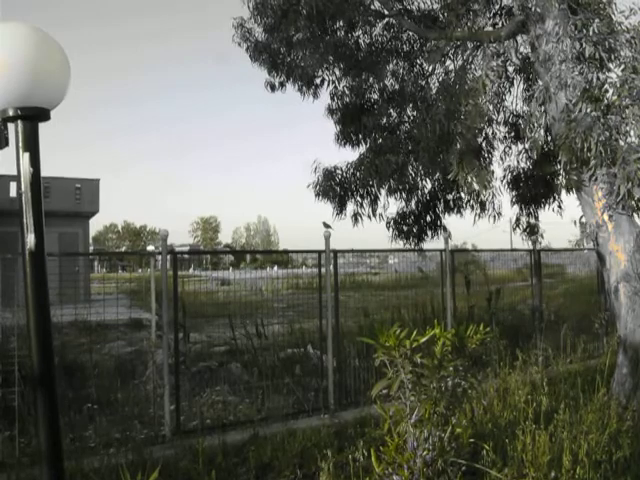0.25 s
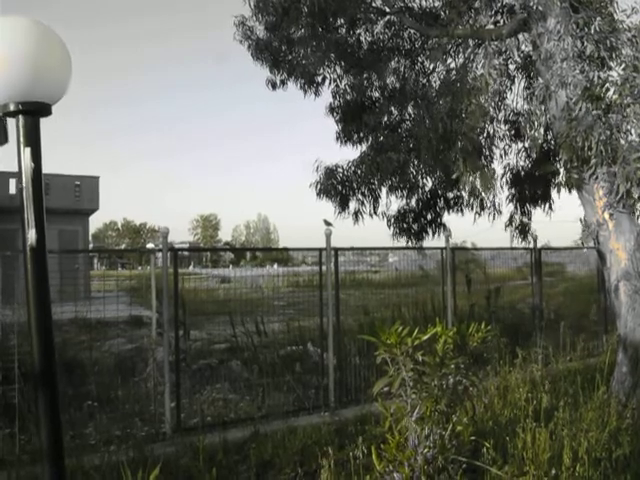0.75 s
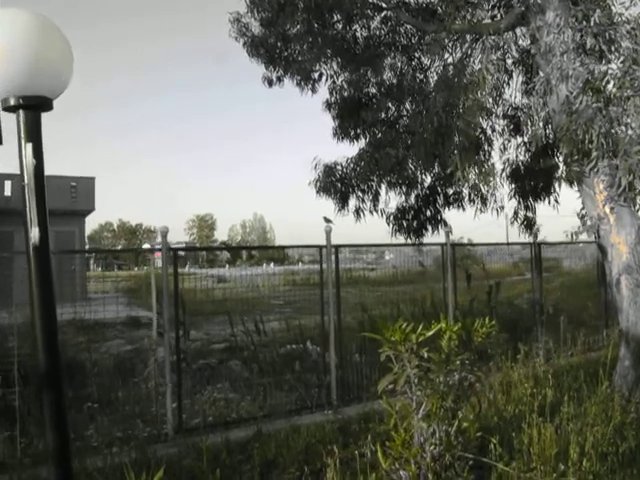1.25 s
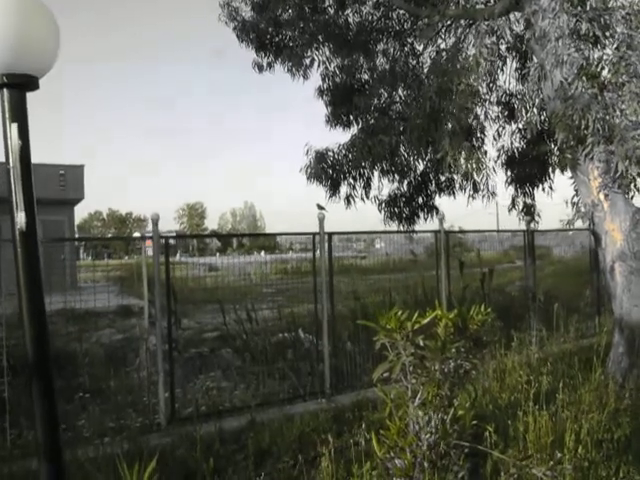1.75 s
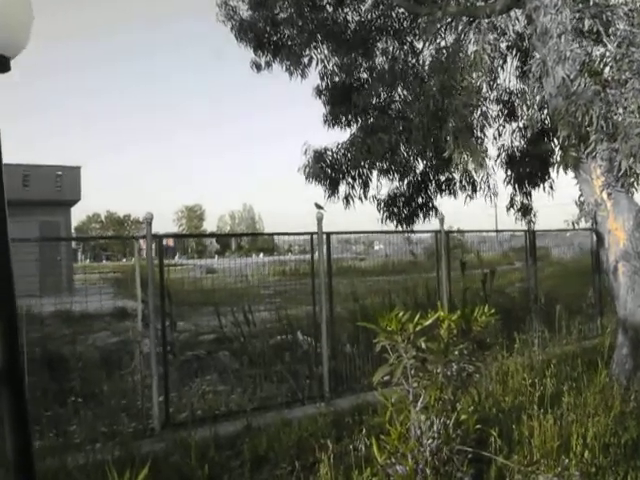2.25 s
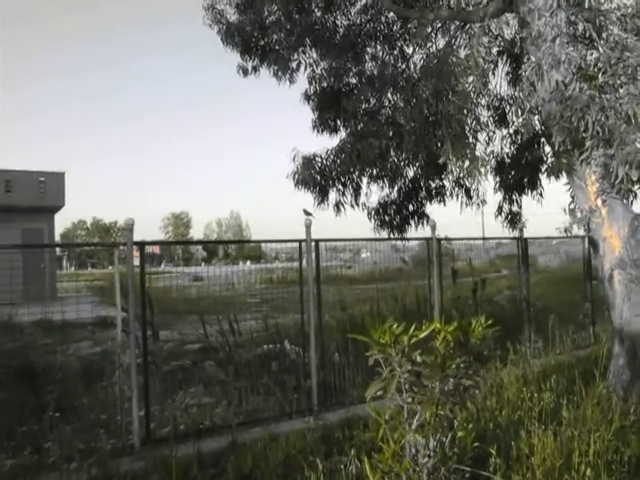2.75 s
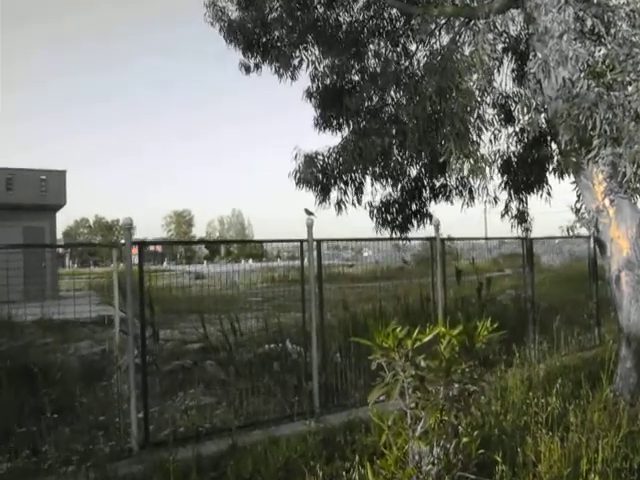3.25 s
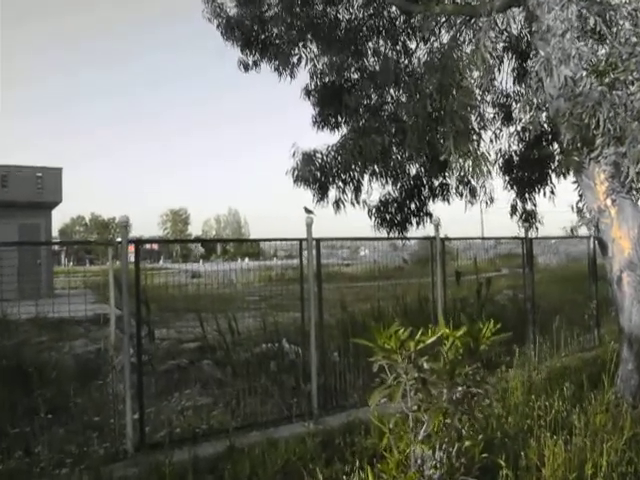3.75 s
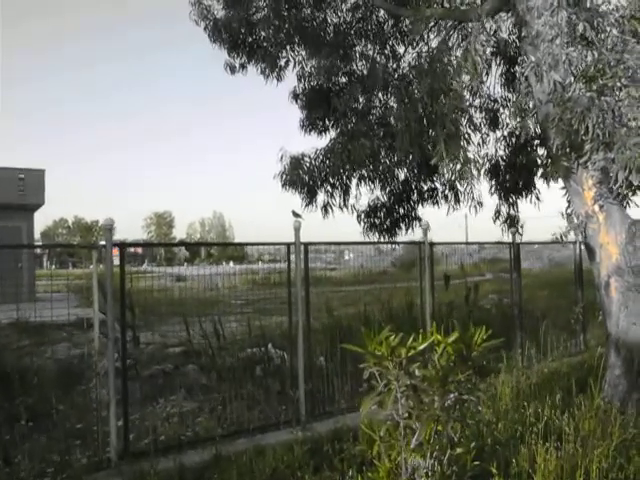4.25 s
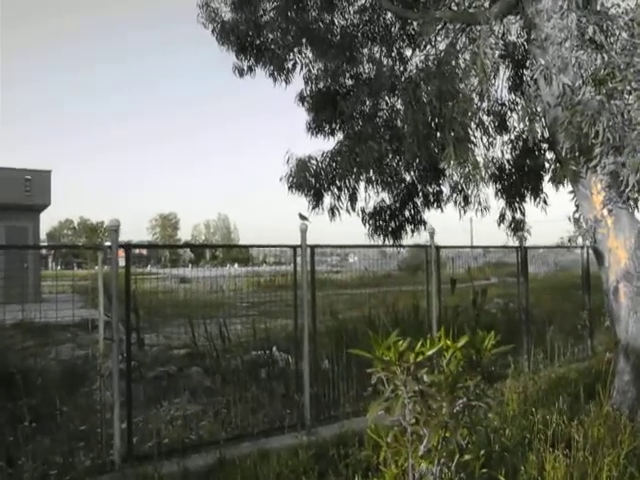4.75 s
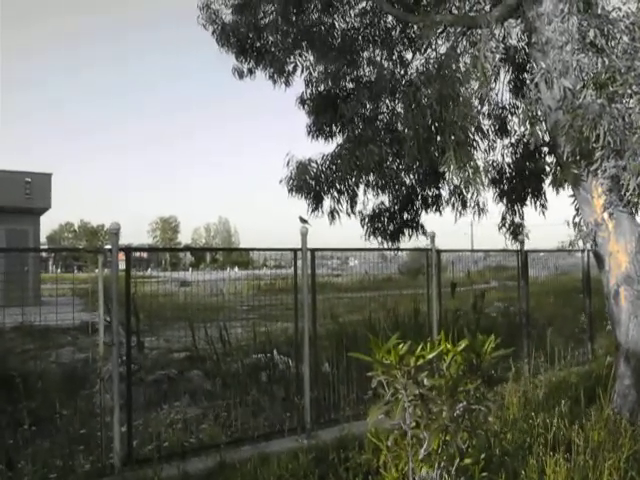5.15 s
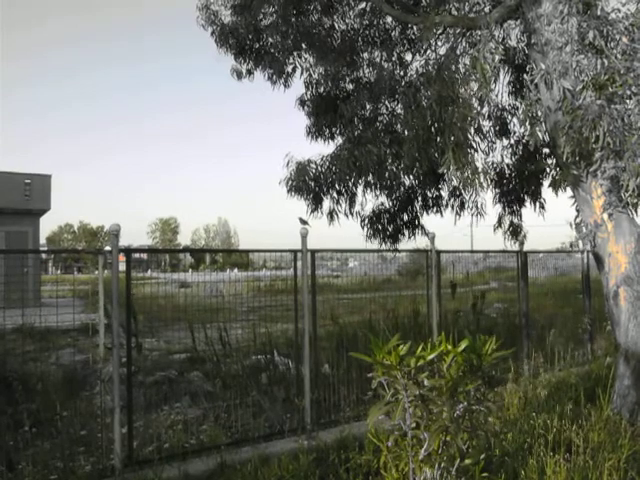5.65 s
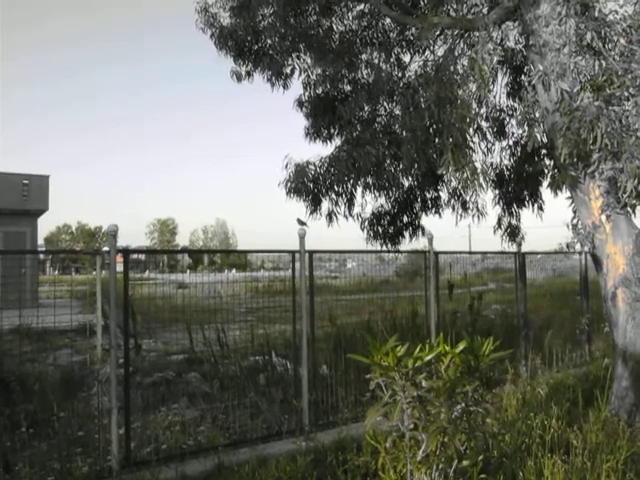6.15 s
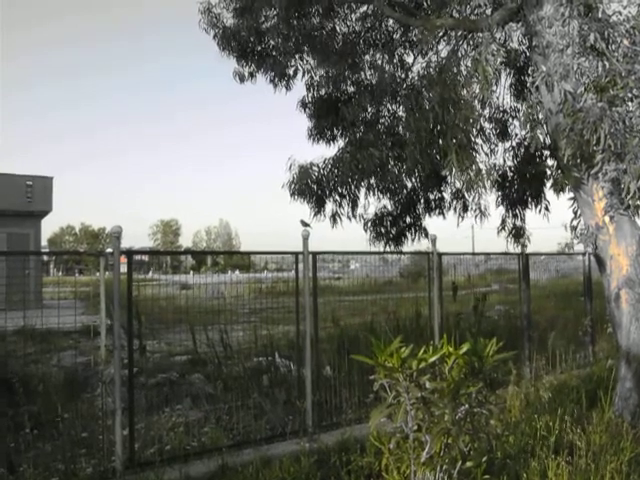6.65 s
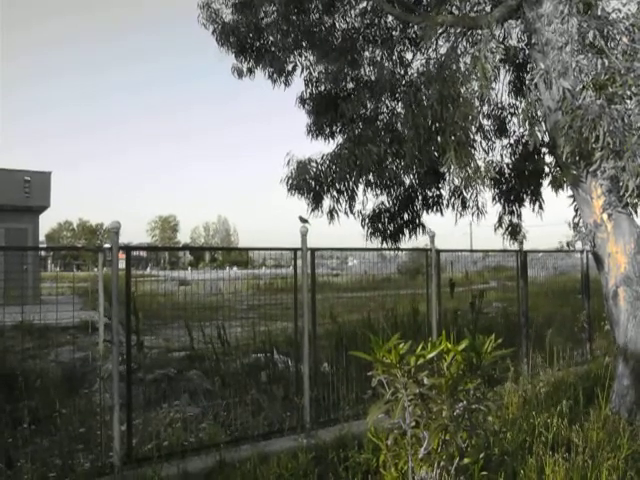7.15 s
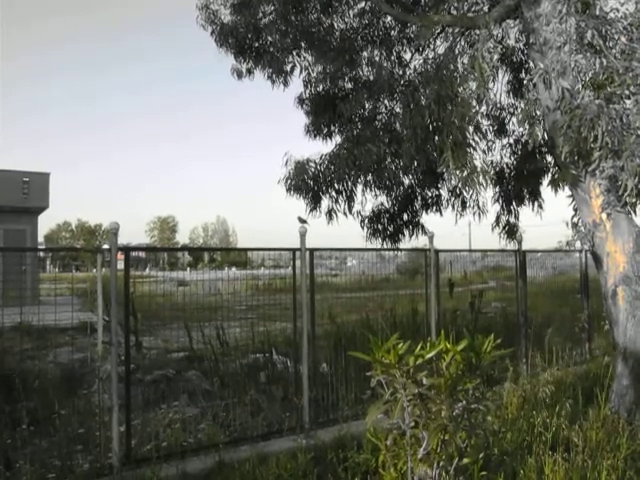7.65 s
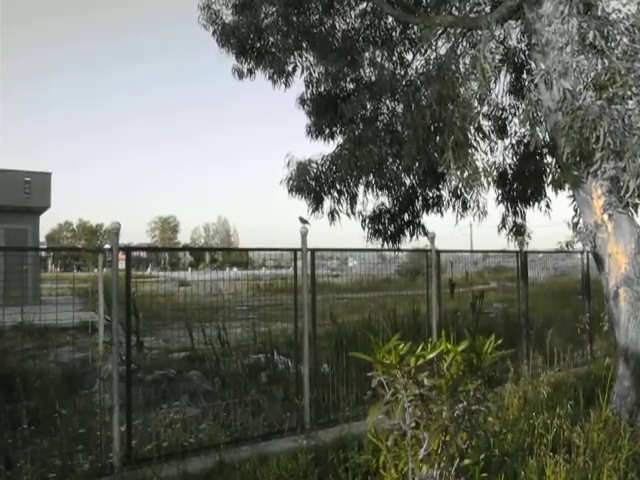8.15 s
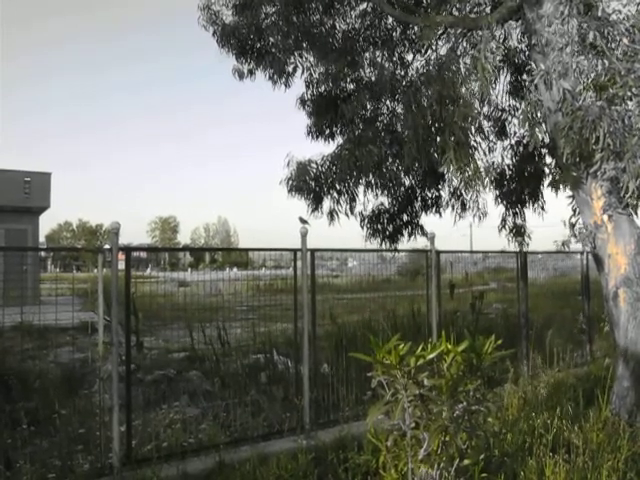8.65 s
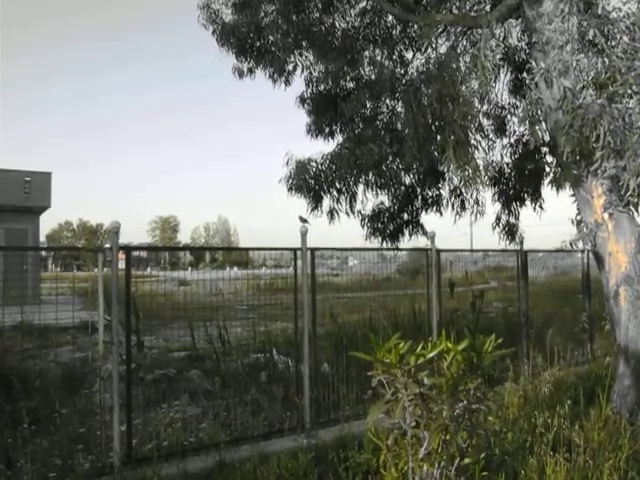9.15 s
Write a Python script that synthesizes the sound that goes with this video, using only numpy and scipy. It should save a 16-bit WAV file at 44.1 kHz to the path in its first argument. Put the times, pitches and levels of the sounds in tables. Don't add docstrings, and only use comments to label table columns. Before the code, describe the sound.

A nightingale sings close to a handheld camera in a garden by a wire fence. It starts with a soft rising whistle, quickens into bright slurs, whipping warbles and a low bubbling run, then rests while distant birds chirp. Two more phrases follow, with long rising whistles and repeated falling slurs. Soft leaf hiss, a faint frog chorus, light early wind and small camera clicks lie around it, with a short echo.

```python
import sys
import numpy as np
from scipy import signal
from scipy.fft import irfft
from scipy.io import wavfile
from scipy.ndimage import uniform_filter1d

SR = 44100
rng = np.random.default_rng(int(sys.argv[2]) if len(sys.argv) > 2 else 0)


def convert_level_to_amplitude(level_db):
    exponent = np.asarray(level_db, float) / 20
    return 10 ** exponent


def log_audio(samples):
    frames = np.atleast_2d(samples).T
    limited = np.clip(frames, -1, 1)
    pcm = np.round(limited * 32767).astype(np.int16)
    wavfile.write(sys.argv[1], SR, pcm)


N = 414099


def evened(x):
    return x / np.sqrt(np.mean(x ** 2) + 1e-20)


def add(mix, s, sound):
    part = mix[round(s * SR):][:len(sound)]
    part += sound[:len(part)]


def wander(rate, count=30):
    t = np.arange(0, N + 256, 256) / SR
    slow = sum(np.sin(2 * np.pi * (f * t + rng.random())) for f in np.geomspace(rate / 30, rate, count))
    return np.interp(np.arange(N) / SR, t, evened(slow))


def coloured(points, patchy_db):
    hz = np.fft.rfftfreq(1024, 1 / SR)
    a, b, patches = rng.standard_normal((N // 256 + 5, 513, 3)).T
    patches = evened(uniform_filter1d(uniform_filter1d(patches, 10, 0), 12, 1))
    f, db = np.transpose(points)
    shape_db = np.interp(np.log(hz + 1), np.log(f + 1), db)[:, None]
    frames = (a + 1j * b) * convert_level_to_amplitude(shape_db + patchy_db * patches)
    return evened(signal.istft(frames, nperseg=1024, noverlap=768)[1][:N])


# frequency in Hz, lift in dB.
BEAK = [(3000, 6.5), (4800, -9.5), (7500, -5), (10500, 8), (14000, 16)]


def note(rows, voice, rise=0.0026, fall=0.0028, glide=0.0022, push=0.12):
    s, hz, db = np.transpose(rows)
    loudest, harmonics_db, flutter = voice
    t = np.arange(s[0], s[-1], 1 / SR)
    bend = max(glide, np.diff(s).min() - .004)
    hz = uniform_filter1d(np.interp(t, s, hz), max(round(bend * SR), 1), mode="nearest") / loudest
    tremor = evened(uniform_filter1d(rng.standard_normal(SR // 3)[:len(t) + 400], 60))
    hz = hz * (1 + flutter * tremor[:len(t)])
    turns = np.cumsum(hz) / SR
    level = np.interp(t, s, convert_level_to_amplitude(db))
    effort_db = push * (20 * np.log10(level) + 30.5)
    tone = 0
    for k, g in enumerate(harmonics_db, 1):
        lift_db = (k > loudest) * (np.interp(k * hz, *np.transpose(BEAK)) + effort_db)
        audible = k * hz < .4 * SR
        tone = tone + convert_level_to_amplitude(g + lift_db) * np.sin(2 * np.pi * k * turns + k * k) * audible
    quick = min(1, (s[-1] - s[0]) / 0.031)
    attack = np.clip((t - s[0]) / (rise * quick), 0, 1)
    release = np.clip((s[-1] - t) / (fall * quick), 0, 1)
    return s[0], np.sqrt(2) * level * np.sin(np.pi / 2 * attack * release) * tone


def sing(notes, voice):
    out = np.zeros(N)
    for rows in notes:
        add(out, *note(rows, voice))
    return out


def repeats(shape, events):
    return [np.array(shape) * [1, np.prod(factor), 1] + [s, 0, db] for s, db, *factor in events]


def trill(start, spacing, full_db, first_db, left, count):
    return [(start + k * spacing, full_db + first_db * left ** k) for k in range(count)]


def strokes(rows, shape, count=9):
    in_db, top, out_db, ease = shape
    u = np.linspace(0, 1, count)
    path = u + ease * (u * u * (3 - 2 * u) - u)
    level_db = 20 * np.log10(np.interp(u, [0, top, 1], convert_level_to_amplitude(np.array([in_db, 0, out_db]))))
    return [np.transpose([s + n * u, a + (b - a) * path, db + level_db]) for s, n, a, b, db in rows]


def arches(rows, ends_db=-6):
    return [np.array([(s, a, db + ends_db), (s + n / 2, b, db), (s + n, a, db + ends_db)])
            for s, n, a, b, db in rows]


def rises(rows, count=30):
    out = []
    for s, n, low, top, db in rows:
        t = np.linspace(0, n, count)
        level_db = db + np.interp(t, [0, .024, .1], [-15, 0, -3.5])
        hz = top - (top - low) * np.exp(-t / .13)
        out.append(np.transpose([s + t, hz, level_db]))
    return out


# frequency in Hz, density in dB per Hz.
HISS = [(120, -12.5), (200, -0.5), (780, -4.5), (1940, -9), (3600, -8.5), (5130, -11), (6500, -12.5),
        (9750, -8.5), (16000, -11)]
GUST = [(12, -28.5), (20, -2.5), (65, 4), (180, -8), (340, -23), (700, -66)]
# time in seconds, level in dB.
WIND = [(0.0, -49), (0.21, -62), (0.47, -52.5), (0.78, -59.5), (1.1, -49.5), (1.18, -56.5), (2.38, -61),
        (6.33, -61), (9.39, -59)]


def air():
    t = np.arange(N) / SR
    wind_db = np.interp(t, *np.transpose(WIND)) + 2.23 * wander(15.0)
    wind = coloured(GUST, 1.37) * convert_level_to_amplitude(wind_db)
    whine = np.sqrt(2) * convert_level_to_amplitude(-66.5 + .6 * wander(9.0)) * np.sin(2 * np.pi * 5880.5 * t)
    swell = convert_level_to_amplitude(-54 + .6 * wander(3.0))
    return swell * coloured(HISS, 1.76) + wind + whine


# centre in Hz, width in Hz, level in dB.
FROGS = [(982, 32, -9), (1070, 22, -4.5), (1139, 91, -12), (1192, 43, -2.5), (1613, 40, -11),
         (543, 53, -13.5)]
# time in seconds, level in dB.
CHORUS = [(0.0, -64.5), (4.81, -58.5), (9.39, -63.5)]


def frogs():
    out, t = np.zeros(N), np.arange(N) / SR
    for hz, width, db in FROGS:
        r = np.exp(-np.pi * width / SR)
        noise = rng.standard_normal(N) + 1j * rng.standard_normal(N)
        crowd = signal.lfilter([1 - r], [1, -r], noise)
        throb = convert_level_to_amplitude(3.2 * wander(12.0))
        out += evened((crowd * np.exp(2j * np.pi * hz * t)).real) * convert_level_to_amplitude(db) * throb
    return out * convert_level_to_amplitude(np.interp(t, *np.transpose(CHORUS)))


PURE = 1, [0, -28, -34, -47, -49, -41], 0.0048
SHRILL = 1, [0, -19], 0.004
# start and length in seconds, from and to in Hz, level in dB.
FAR_CHIRPS = [(2.204, .012, 3600, 6370, -58), (3.46, .13, 3920, 3960, -61), (3.59, .03, 3960, 3360, -52),
              (3.858, .02, 3120, 4150, -51), (4.362, .008, 4060, 5380, -55), (4.59, .06, 4780, 5050, -57),
              (4.633, .012, 4670, 7890, -57), (4.805, .017, 4850, 4250, -54), (4.94, .022, 3200, 3700, -55),
              (5.025, .023, 4960, 4200, -54), (5.078, .014, 3980, 5090, -54),
              (5.155, .017, 2960, 3600, -55), (5.225, .01, 2290, 1860, -54), (5.238, .012, 3150, 5060, -57),
              (5.41, .026, 4150, 4600, -53), (5.497, .01, 2180, 3020, -53), (8.8, .025, 3780, 3380, -57),
              (9.282, .023, 4100, 4540, -55)]
CHIRP = -2, .4, -3, .3
# start and length in seconds, ends and middle in Hz, level in dB.
FAR_ARCHES = [
    (.145, .02, 2260, 3280, -58),
    (4.07, .035, 3000, 4010, -53),
    (4.608, .025, 4750, 4300, -47),
    (5.097, .028, 3600, 4130, -54),
    (8.448, .013, 4050, 4700, -58),
    (8.461, .016, 3930, 4800, -58),
]
# seconds from the start, pitch in Hz, level in dB.
PEEP = [(-.004, 8400, -12), (.003, 7850, -7), (.016, 7400, 2), (.027, 6900, -4)]
PURR = [(0, 1950, -4), (.004, 1800, 0), (.009, 1650, -4)]
TICK = [(.003, 7430, -2), (.008, 5280, -0.0079)]
# start and spacing in seconds, full level in dB, first note's dB over it, share left per note.
PEEP_RUN = (.277, .0402, -47, -15, .45)
PURR_RUN = (1.859, .0223, -57, 2, .8)
# start in seconds, level in dB.
TICKS = [(3.986, -56), (4.014, -57), (4.721, -55), (4.746, -51), (4.773, -52), (4.8, -53), (4.85, -55),
         (4.904, -57), (4.938, -60), (4.983, -60.0)]


def distant_birds():
    notes = strokes(FAR_CHIRPS, CHIRP) + arches(FAR_ARCHES) + repeats(TICK, TICKS)
    notes += repeats(PURR, trill(*PURR_RUN, count=9))
    peeps = repeats(PEEP, trill(*PEEP_RUN, count=7))
    return sing(notes, PURE) + sing(peeps, SHRILL)


# start in seconds, level in dB, ring in Hz, t60 in seconds.
KNOCKS = [
    (.555, -30, 1160, 0.03),
    (.557, -40, 2500, .2),
    (3.674, -35, 2800, 0.022),
    (3.758, -38, 2600, 0.013),
    (4.678, -30, 3000, 0.0091),
    (6.4258, -29, 5600, 0.005),
    (9.12, -37.5, 685, 0.018),
    (.572, -38, 680, 0.3),
    (8.982, -42, 620, .04),
]


def knocks():
    out, t = np.zeros(N), np.arange(SR // 3) / SR
    for s, db, hz, t60 in KNOCKS:
        rattle = rng.standard_normal(len(t)) * convert_level_to_amplitude(-60 * t / t60)
        ring = signal.lfilter(*signal.iirpeak(hz, 1.5, SR), rattle)
        add(out, s, convert_level_to_amplitude(db) * (ring / abs(ring).max() + 0.23 * rattle))
    return out


# start and length in seconds, from and to in Hz, level in dB.
PLUCKS = [
    (.652, .007, 2730, 5530, -39),
    (.779, .015, 2900, 3600, -54),
    (1.566, .012, 4300, 3250, -47),
    (1.577, .022, 3300, 2650, -45),
    (1.675, .02, 4080, 4400, -56),
    (1.812, .033, 2280, 1590, -51),
    (2.162, .04, 2120, 1420, -34),
    (2.162, .038, 2330, 1640, -37),
    (6.205, .015, 2200, 1200, -36),
]
SWELLS = [
    (1.545, .02, 2650, 3350, -46),
    (1.36, .07, 2570, 2470, -50),
    (2.419, .014, 2550, 3100, -40),
]
PLUCK = -3, .2, -9, .2
SWELL = -13, .6, -5, 1.4
# time in seconds, pitch in Hz, level in dB.
QUERY = [(1.245, 3700, -60), (1.256, 3990, -58), (1.269, 4234, -49), (1.278, 4420, -54), (1.29, 5000, -60)]
STEP_DOWN = [(1.795, 5200, -50), (1.808, 4950, -43), (1.82, 4200, -40), (1.83, 3650, -39),
             (1.842, 3400, -48)]
LEAD = [(1.925, 3700, -50), (1.94, 3786, -28), (1.952, 3990, -29.5), (1.96, 5600, -48)]
SCOOP_LOW = [(2.0, 4300, -42), (2.007, 3420, -25), (2.013, 3340, -22), (2.021, 3450, -25),
             (2.033, 4600, -44)]
TURN = [(2.035, 4000, -40), (2.044, 3330, -26), (2.053, 3310, -24), (2.062, 3420, -28), (2.09, 3290, -40)]
HIGH_FALL = [(2.256, 5630, -54), (2.272, 5660, -24.5), (2.285, 5170, -22.5), (2.298, 4450, -43)]
WARBLE = [(2.875, 3750, -21), (2.881, 3740, -14.5), (2.885, 3650, -19), (2.893, 2950, -24),
          (2.905, 2830, -16), (2.919, 3320, -24), (2.926, 3050, -17), (2.933, 2550, -20),
          (2.942, 1900, -46)]
WARBLE_AGAIN = [(3.0, 3720, -22), (3.006, 3720, -16), (3.011, 3600, -20), (3.018, 3000, -22),
                (3.026, 2800, -18), (3.042, 3220, -22), (3.051, 2950, -18), (3.058, 2450, -24),
                (3.067, 1900, -48)]
CLIMB = [(5.615, 4930, -47.5), (5.65, 5580, -52.5), (5.71, 6140, -56), (5.74, 6700, -56),
         (5.758, 7300, -53)]
SWOOP = [(6.115, 3680, -54), (6.123, 4720, -47), (6.132, 4810, -25), (6.145, 3560, -21), (6.157, 2290, -32)]
WHOOP = [(6.467, 3150, -40), (6.472, 4200, -32), (6.4755, 5800, -23), (6.48, 8600, -34), (6.488, 9650, -40)]
# seconds from the start, pitch in Hz, level in dB.
DROP = [(0, 2800, 0), (.0045, 1650, -3)]
DROP_TAIL = [(.021, 1560, -9), (.03, 1380, -8)]
STEP = [(0, 7620, -28), (.012, 7480, -12), (.022, 7200, -2), (.03, 6600, 0), (.04, 6100, -10)]
SLIDE = [(0, 7850, -30), (.012, 7550, -12), (.022, 7050, 0), (.032, 6400, -4), (.04, 6120, -8)]
SCOOP = [(0, 4400, -22), (.007, 3620, -2), (.013, 3540, 0), (.021, 3620, -4), (.03, 5200, -28)]
WHIP_HIGH = [(-.006, 4000, -24), (.003, 9300, -18)]
CHEW = [(0, 2360, -9), (.0135, 2740, 0), (.0215, 3130, -8), (.028, 2130, 0)]
CHEW_TAIL = [(.0355, 2080, -5), (.058, 2530, -1), (.072, 2570, -11)]
HOOK = [(0, 2750, -4), (.006, 2050, -4), (.013, 2200, -8), (.019, 2600, -3), (.026, 3190, 0),
        (.038, 3120, -8), (.056, 3150, -26)]
TSIP = [(0, 7000, -36), (.015, 5900, -9), (.024, 5250, 0), (.042, 3400, -7)]
UNDER = [(.001, 1614, -11), (.01, 1760, -9), (.021, 1760, -17)]
SLUR = [(0.0, 7750, -40), (0.013, 7650, -9), (0.023, 7250, 0), (0.031, 6480, -3.5), (0.042, 6150, -4)]
# start in seconds, level in dB, pitch factor if it varies.
DROPS = [(1.116, -45), (1.243, -43), (7.586, -38)]
STEPS = [(1.339, -39), (1.547, -34, .985)]
SLIDES = [(1.441, -33.5), (1.649, -30.5)]
SCOOPS = [(1.965, -22)]
WHIPS = [(2.868, -26), (2.992, -26.5), (3.122, -28.5, 1.07)]
CHEWS = [(5.849, -26), (5.986, -25)]
HOOKS = [(6.267, -24), (6.359, -23)]
TSIPS = [(6.907, -32), (8.746, -34)]
CHUPS = [(7.044, -42), (7.095, -41), (7.148, -41.0), (8.882, -45), (8.934, -42), (8.985, -42.0)]
SLURS = [(7.704, -33, 1.0), (7.797, -27.5), (7.888, -27), (7.981, -24.5), (8.078, -27, 1.0), (8.166, -54)]


def whistles():
    notes = [LEAD, TURN, HIGH_FALL, CLIMB, SWOOP, WHOOP, WARBLE, WARBLE_AGAIN, QUERY, STEP_DOWN, SCOOP_LOW]
    notes += strokes(SWELLS, SWELL) + strokes(PLUCKS, PLUCK)
    for shape, events in [(SLUR, SLURS), (SLIDE, SLIDES), (STEP, STEPS), (UNDER, CHUPS), (DROP, DROPS),
                          (DROP_TAIL, DROPS), (SCOOP, SCOOPS), (WHIP_HIGH, WHIPS), (CHEW, CHEWS),
                          (CHEW_TAIL, CHEWS), (HOOK, HOOKS), (TSIP, TSIPS)]:
        notes += repeats(shape, events)
    return sing(notes, PURE)


SMOOTH = 1, [0, -30, -37], 0.003
# time in seconds, pitch in Hz, level in dB.
OPENING = [(.78, 2300, -56), (.791, 2850, -45), (.804, 3153, -39), (.848, 3548, -35), (.92, 3715, -31),
           (.96, 3873, -36), (1.015, 3995, -32), (1.032, 3990, -42)]
# seconds from the start, pitch in Hz, level in dB.
PIP = [(0, 1900, -24), (.022, 2500, 0), (.036, 2560, -3), (.047, 2500, -14)]
# start in seconds, level in dB.
PIPS = [(1.758, -30), (8.186, -31)]
# start and length in seconds, low and top in Hz, level in dB.
RISES = [
    (7.243, .272, 2500, 3790, -27.5),
    (9.083, .306, 2500, 3720, -26),
]


def smooth_whistles():
    return sing([OPENING] + rises(RISES) + repeats(PIP, PIPS), SMOOTH)


# start and length in seconds, from and to in Hz, level in dB.
FAINT_CHIRPS = [(.785, .055, 5050, 4950, -58), (.99, .03, 4900, 5000, -59), (1.272, .022, 2750, 3100, -56),
                (1.645, .024, 4900, 5250, -54), (1.766, .02, 3600, 2700, -37),
                (1.815, .025, 6900, 5200, -55), (1.848, .02, 3600, 2500, -56),
                (2.168, .018, 5000, 7400, -57), (4.078, .02, 2500, 2750, -58),
                (4.337, .008, 3700, 5000, -59), (4.565, .02, 3900, 4300, -56), (4.64, .03, 4300, 4250, -56),
                (4.822, .012, 4250, 4450, -56), (4.748, .016, 3100, 5000, -59),
                (5.048, .025, 4250, 4350, -57), (5.145, .05, 5500, 5480, -62), (5.22, .04, 5480, 5500, -63),
                (5.385, .025, 4900, 5250, -59), (5.515, .04, 5400, 5150, -59),
                (5.575, .02, 3200, 4600, -60), (5.69, .04, 3250, 3200, -61), (5.98, .032, 4000, 4600, -55),
                (6.392, .028, 3700, 4250, -55), (8.125, .035, 3250, 2800, -55),
                (8.678, .014, 4800, 4500, -57), (8.9, .025, 4600, 4200, -59),
                (9.015, .025, 3000, 3500, -59)]


def faint_calls():
    flicker_db = 4.0 * wander(60.0)
    return sing(strokes(FAINT_CHIRPS, CHIRP), PURE) * convert_level_to_amplitude(-5 + flicker_db)


MID_REED = 5, [-50, -46, -25, 0.5, -1, -8, -4, -18, -18, -24, -22], 0.018
HIGH_REED = 7, [-50, -37, -16, -26, -20, -4, 5, 5, -3, -14, -12, -22, -26, -26, -22, -18, -17, -18], 0.008
# time in seconds, pitch in Hz, level in dB.
STACKS = [
    [(1.74, 2810, -62), (1.757, 3480, -43), (1.766, 3800, -40), (1.772, 4200, -50)],
    [(8.18, 3220, -70), (8.19, 3770, -35), (8.2, 4000, -59)],
]
RASP = [
    [(6.443, 4000, -48), (6.449, 4950, -40), (6.459, 5250, -38), (6.467, 5900, -36), (6.473, 7600, -48)],
]


def rattles():
    return sing(STACKS, MID_REED) + sing(RASP, HIGH_REED)


CRACKED = 2, [-19, 1, -13, -20, -26], 0.012
# seconds from the start, pitch in Hz, level in dB.
SNAP = [(0, 7400, -10), (.002, 6600, -4), (.0045, 5000, 0), (.008, 4100, -17)]
# start in seconds, level in dB, pitch factor if it varies.
SNAPS = [(2.3465, -27), (2.366, -27.5, 1.05)]


def snaps():
    return sing(repeats(SNAP, SNAPS), CRACKED)


HOLLOW = 1, [0, -55, -36], 0.004
# time in seconds, pitch in Hz, level in dB.
LOW_FALL = [(2.43, 2370, -32), (2.438, 2460, -21), (2.451, 2430, -17), (2.478, 2145, -26),
            (2.508, 1960, -38)]
# seconds from the start, pitch in Hz, level in dB.
JUG = [(-.002, 1410, -14), (.006, 1422, 0), (.012, 1424, -2), (.019, 1425, -20)]
JUG_ARCH = [(-.004, 2400, -24), (.004, 2800, -19), (.011, 2900, -20), (.021, 2500, -23)]
# start in seconds, level in dB.
JUGS = [(2.555, -45), (2.583, -34.5), (2.613, -37.5), (2.641, -35.5), (2.673, -37.5), (2.705, -39.0),
        (2.736, -35), (2.767, -39.0), (2.799, -40)]


def hollow_notes():
    return sing([LOW_FALL] + repeats(JUG, JUGS) + repeats(JUG_ARCH, JUGS), HOLLOW)


CRISP = 1, [0, -22, -20], 0.005
# seconds from the start, pitch in Hz, level in dB.
WHIP = [(0, 3400, -9), (.003, 4200, 0), (.009, 5800, -3)]


def whips():
    return sing(repeats(WHIP, WHIPS), CRISP)


BRIGHT = 1, [0, -12, -17, -20], 0.005
# time in seconds, pitch in Hz, level in dB.
WARBLE_CUT = [(3.127, 3250, -42), (3.133, 3600, -33), (3.139, 3560, -31), (3.146, 3000, -42)]


def cut_warble():
    return sing([WARBLE_CUT], BRIGHT)


# start and length in seconds, from and to in Hz, level in dB.
NEIGHBOUR = [
    (4.368, .037, 3800, 2780, -38),
    (4.408, .036, 3550, 2560, -37.5),
    (4.478, .024, 2170, 2480, -49),
    (4.5, .032, 2800, 2570, -40),
]


def neighbour():
    return sing(strokes(NEIGHBOUR, SWELL), PURE)


DOUBLED = 2, [-13.5, 1, -9.5, -20.5, -29, -30], 0.0051
# seconds from the start, pitch in Hz, level in dB.
TUT = [(0, 3560, -14), (.007, 4070, 0), (.012, 3800, -4), (.017, 2800, -22)]
# start in seconds, level in dB.
TUTS = [(6.774, -36), (8.609, -38)]


def tuts():
    return sing(repeats(TUT, TUTS), DOUBLED)


LOW_REED = 3, [-45, -30, -1.5, -24, -18], 0.022
# seconds from the start, pitch in Hz, level in dB.
CHUP = [(0.0, 2050, -10), (0.013, 2480, -1.5), (0.022, 2560, 2), (0.03, 2150, -5)]


def chups():
    return sing(repeats(CHUP, CHUPS), LOW_REED)


# delay in seconds, level in dB, frequency returned best in Hz.
ECHOES = [
    (.0109, -13.5, 4500),
    (.0829, -18.5, 3500),
]


def garden(x, echo_db, leaves_db, leaves_t60, yard_db, yard_t60):
    t, taps = np.arange(SR // 2) / SR, np.zeros(SR // 2)
    at = np.arange(100, len(t) - 20, 20)
    taps[at + rng.integers(0, 20, len(at))] = rng.choice([-1., 1.], len(at))
    leaves = signal.lfilter([1, -.9], 1, taps) * convert_level_to_amplitude(-60 * t / leaves_t60)
    yard = signal.lfilter([1], [1, -.4], taps) * convert_level_to_amplitude(-60 * t / yard_t60)
    response = convert_level_to_amplitude(leaves_db) * leaves / np.linalg.norm(leaves)
    response += convert_level_to_amplitude(yard_db) * yard / np.linalg.norm(yard)
    for s, db, hz in ECHOES:
        rough_wall = 0.07 * rng.standard_normal(900) * convert_level_to_amplitude(-60 * t[:900] / 0.03)
        rough_wall[0] = 1
        face = signal.iirpeak(hz, 1.1, SR)
        returned = signal.lfilter(*face, signal.lfilter(*face, rough_wall))
        add(response, s, convert_level_to_amplitude(db + echo_db) * returned)
    return x + signal.fftconvolve(x, response)[:N]


def scene():
    near = whistles() + smooth_whistles() + rattles() + snaps() + hollow_notes()
    near += whips() + cut_warble() + tuts() + chups()
    far = distant_birds() + knocks() + faint_calls() + neighbour()
    near_in_garden = garden(near, echo_db=-.1, leaves_db=-2.5, leaves_t60=.11, yard_db=-18.5, yard_t60=0.6)
    far_in_garden = garden(far, echo_db=-6, leaves_db=-12, leaves_t60=0.23, yard_db=-13, yard_t60=0.81)
    return (near_in_garden + far_in_garden + frogs() + air())[None]


def top_cut(x):
    return signal.sosfilt(signal.butter(12, 16370, fs=SR, output="sos"), x)


# frequency in Hz, gain in dB.
PORT = [(0, 0), (9800, 0), (10800, -8), (11400, -19), (11700, -38), (11780, -60), (11860, -36),
        (12200, -18), (13000, -15), (15700, -19), (15800, -70)]


def record(dry):
    port_db = np.interp(np.fft.rfftfreq(2048, 1 / SR), *np.transpose(PORT))
    colour = np.fft.fftshift(irfft(convert_level_to_amplitude(port_db))) * np.hanning(2048)
    mix = signal.oaconvolve(dry, colour[None], "same")
    return top_cut(mix)


dry = scene()
out = record(dry)
log_audio(out)
```